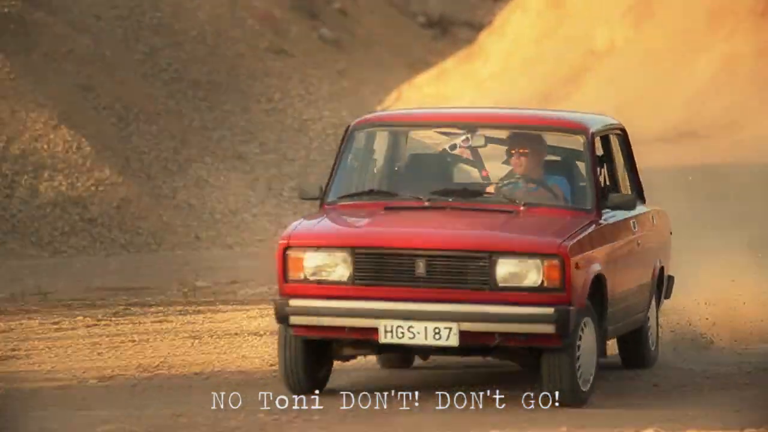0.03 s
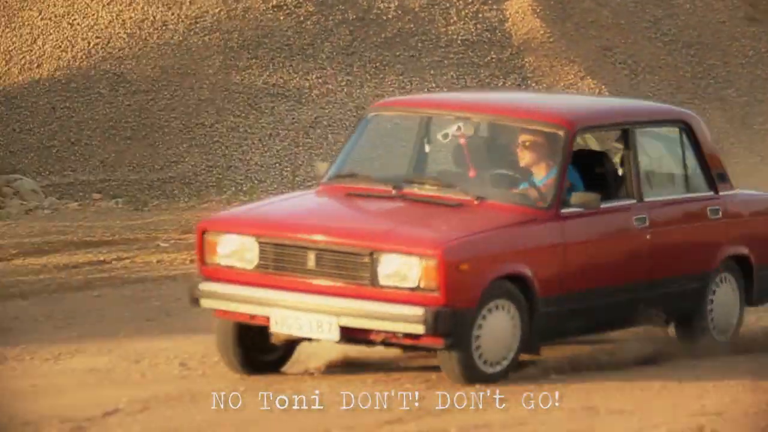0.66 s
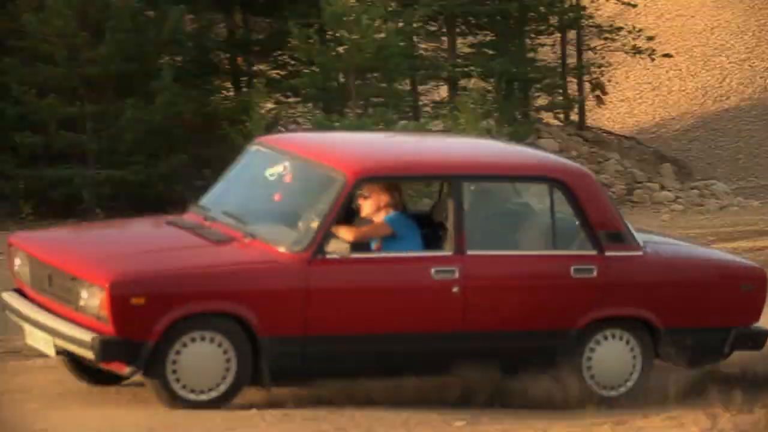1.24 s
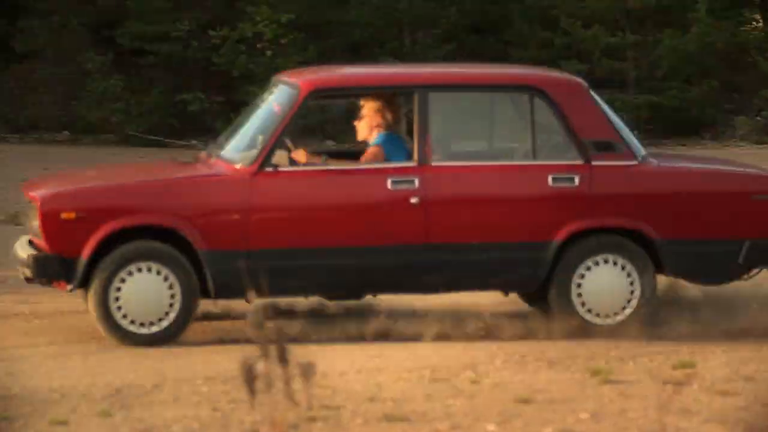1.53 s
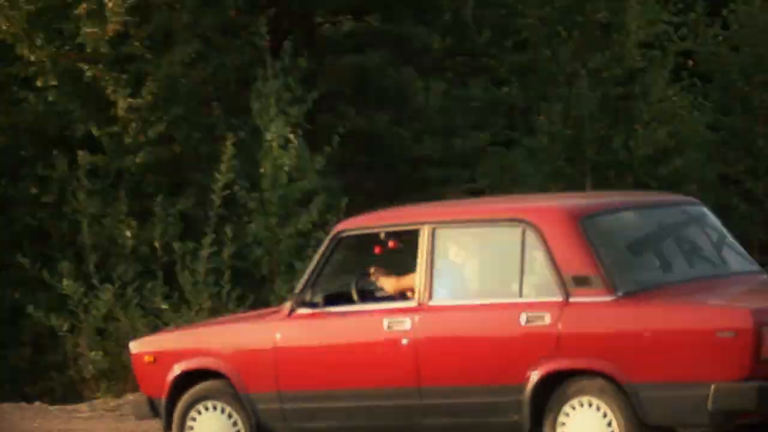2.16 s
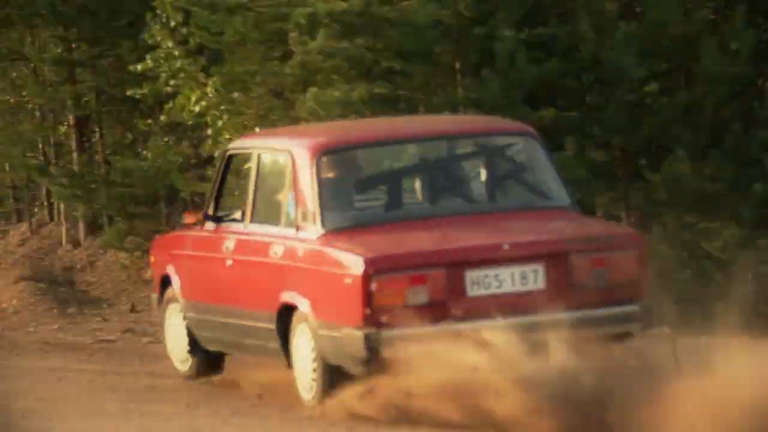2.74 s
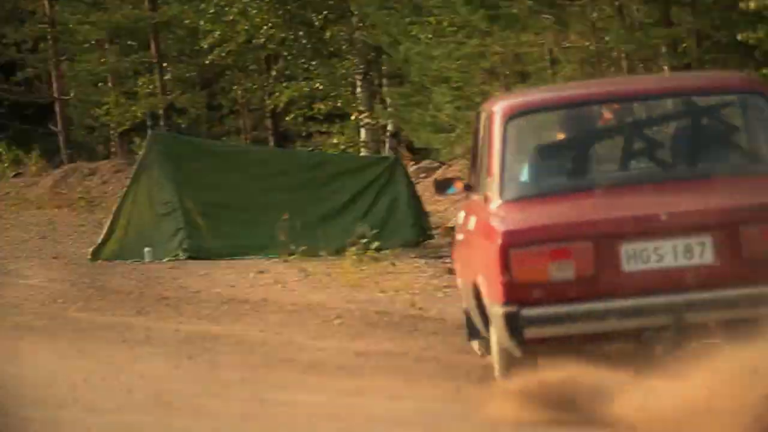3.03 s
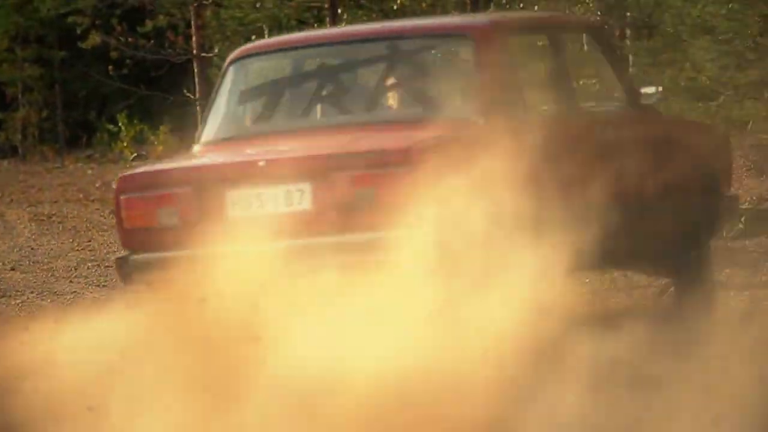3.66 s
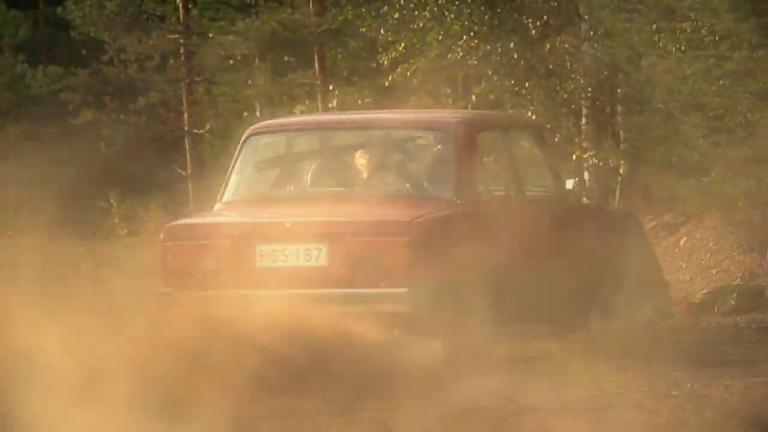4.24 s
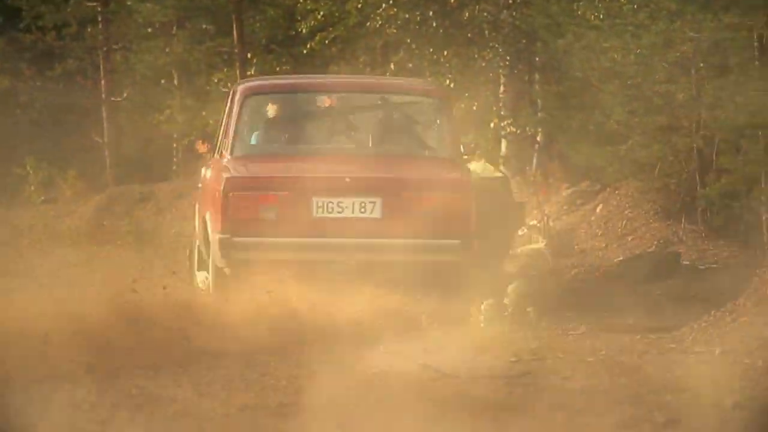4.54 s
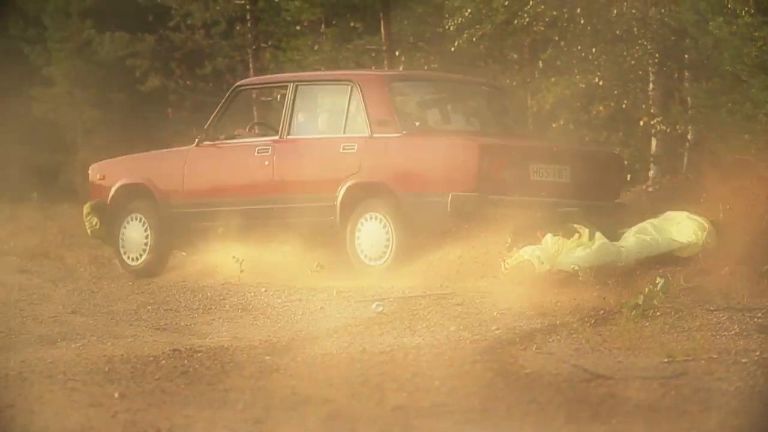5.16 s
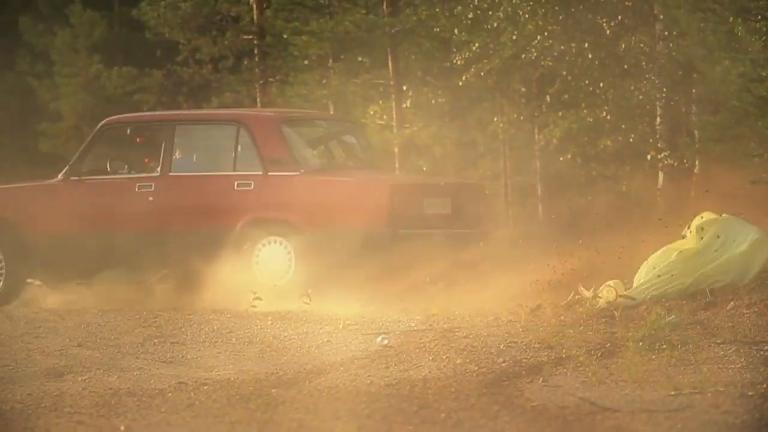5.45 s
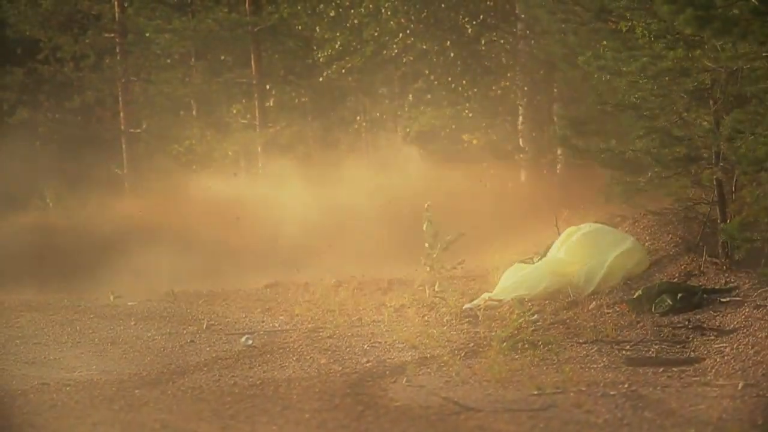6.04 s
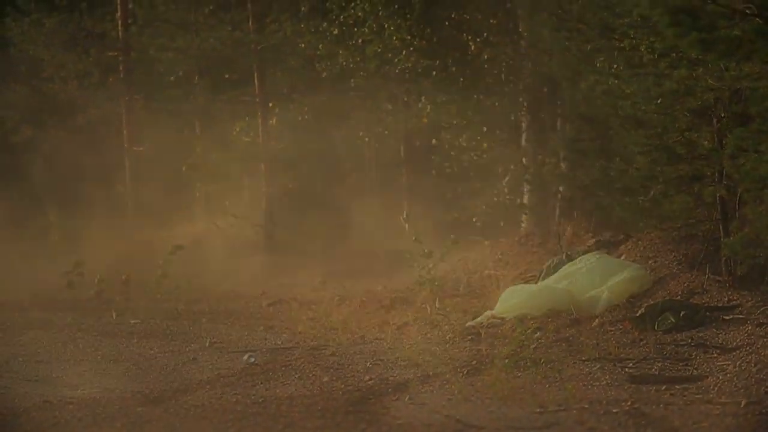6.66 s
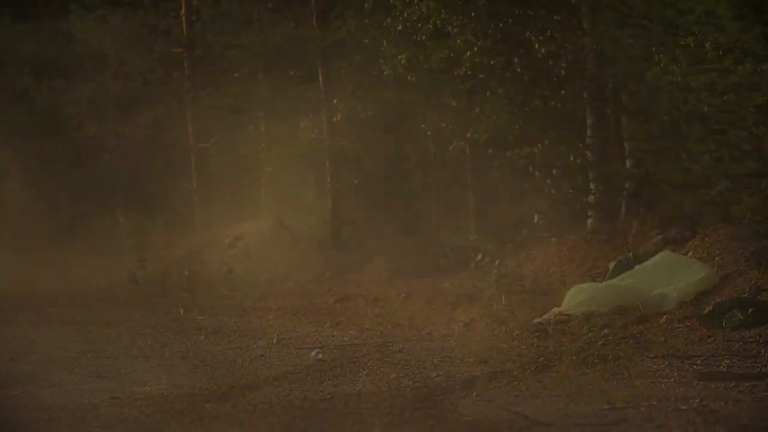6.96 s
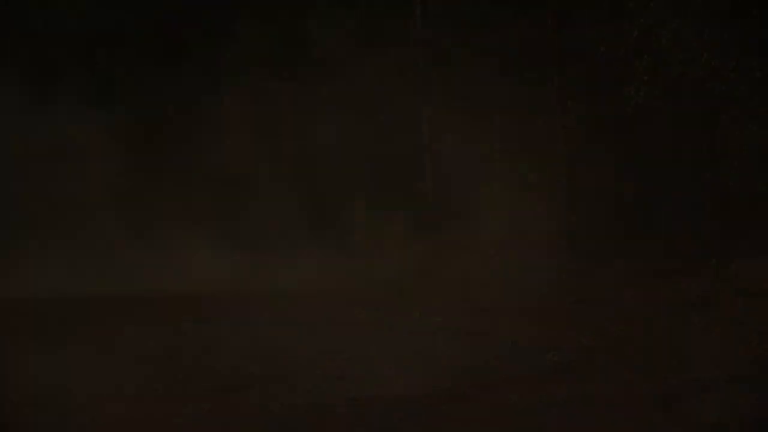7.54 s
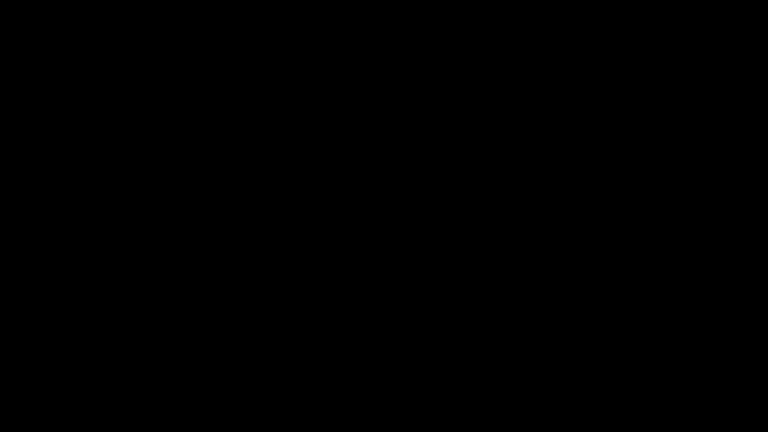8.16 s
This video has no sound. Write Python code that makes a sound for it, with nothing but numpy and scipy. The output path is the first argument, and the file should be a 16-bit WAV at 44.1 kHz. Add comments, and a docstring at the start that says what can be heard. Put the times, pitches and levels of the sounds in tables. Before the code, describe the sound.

A car comes closer over loose gravel in the open air, its engine droning at high, slightly wavering revs above crunching tyres. Grit sprays at about 1 second. The car is loudest as it slides past between 1.5 and 2.7 seconds, the exhaust booming, the revs climbing and the tyres roaring and scrubbing. At 2.8 seconds a stone hits the body with a loud, sharp crack and a thin ping. The skid continues as the car moves away. Around 4.6 seconds the wheels make a cluster of dull thumps and dry snaps. Showers of hissing grit follow until about 6.3 seconds, with stones ticking, knocking and ringing lightly on the metal. More thumps come between 6.2 and 6.5 seconds. The level then eases down, the revs drop at about 7 seconds, and the sound fades to silence just before 8 seconds.

```python
"""A high-revving four-cylinder drone and a rush of gravel close in, slide past and cross a quarry.
The exhaust booms at the firing rate; the tyres roar, scrub and crunch as they grind loose stones.
Flung grit sprays, stones knock and ping on the saloon's body, and the wheels thump over a tent
and rough ground. Near the end the throttle closes, the revs drop and the sound fades out."""
import sys
import numpy as np
from scipy import signal
from scipy.fft import rfft, irfft, next_fast_len
from scipy.io import wavfile

SR = 44100
rng = np.random.default_rng(int(sys.argv[2]) if len(sys.argv) > 2 else 0)


def inscribe(sig):
    """Save sig as 16-bit PCM at rate SR to the path in sys.argv[1].

    A 1-D sig is mono; a 2-D sig holds one channel per row.
    Samples are clipped to [-1, 1] before scaling.
    """
    pcm = np.round(np.clip(np.atleast_2d(sig).T, -1, 1) * 32767)
    wavfile.write(sys.argv[1], SR, pcm.astype(np.int16))


N = 366294
TIME = np.arange(N) / SR
EDGE_HZ = 15800  # top of the band

# tone of the tyre roar and the exhaust puffs: freq_hz, relative_db
ROAR_SPECTRUM = [(60, -34.5), (130, -6), (200, -3.5), (275, 2.5), (400, -2), (500, -5.5), (730, -3.5),
                 (1100, -12.5), (1500, -17.5), (2500, -36), (6000, -63.5)]
# share of the gravel sound heard from behind the car: time_s, share (0-1)
REAR_SHARE = [(0, 0.11), (.3, 0.4), (.6, 0.16), (1.3, 0.01), (2.1, 0), (3, 0.29), (4.1, 0.48), (4.7, 0.88),
              (7.8, 0.42)]
# engine speed: time_s, firing_hz
FIRING_RATE = [(0, 150.3), (.33, 131.4), (.75, 133), (1.36, 151), (1.62, 129.6), (1.82, 145), (2.47, 173),
               (2.85, 167.3), (4.05, 174.3), (4.45, 162), (4.85, 146.5), (5.38, 173.4), (5.75, 162.3),
               (6.97, 167.4), (7.14, 128.8), (7.28, 126.8), (7.52, 102.1), (7.85, 117.2)]


def amp(db):
    """Decibels to gain."""
    return 10 ** (np.asarray(db) / 20)


def unit(x):
    """Scales to rms 1."""
    return x / np.sqrt(np.mean(x ** 2) + 1e-20)


def curves(rows):
    """Each column after the first as a curve over time."""
    times, *columns = np.transpose(rows)
    return [np.interp(TIME, times, column) for column in columns]


def add(mix, start_s, sound):
    """Lays a sound into the mix."""
    part = mix[max(round(start_s * SR), 0):][:len(sound)]
    part += sound[:len(part)]


def blend(a, b, share):
    """Equal-power crossfade with the given share of b."""
    share = np.clip(share, 0, 1)
    return np.sqrt(1 - share) * a + np.sqrt(share) * b


def colour(x, spectrum, size=4096):
    """Minimum-phase EQ that keeps clicks sharp and falls 12 dB an octave beyond its ends; rms 1."""
    hz, db = np.transpose(spectrum)
    f = abs(np.fft.fftfreq(size, 1 / SR)) + 10
    skirts = np.minimum(f / hz[0], 1) ** 2 * np.minimum(hz[-1] / f, 1) ** 2
    log_gain = np.log(skirts * amp(np.interp(np.log(f), np.log(hz), db)))
    response = np.fft.ifft(np.exp(np.conj(signal.hilbert(log_gain)))).real
    return unit(signal.oaconvolve(x, response[:size // 2])[:N])


def resonate(x, hz, width_hz):
    """A single resonant band."""
    return signal.lfilter(*signal.iirpeak(min(hz, EDGE_HZ), hz / min(width_hz, EDGE_HZ), fs=SR), x)


def burst(t, decay_s):
    """Noise that starts at once and dies away."""
    return rng.standard_normal(len(t)) * np.exp(-t / decay_s)


def wander(rate_hz):
    """Random drift up to about the given rate; rms 1."""
    size = next_fast_len(N)
    rolloff = 1 + (np.fft.rfftfreq(size, 1 / SR) / rate_hz) ** 4
    return unit(irfft(rfft(rng.standard_normal(N), size) / rolloff)[:N])


def impacts(per_s, spread_db):
    """Random tiny collisions, most of them weak and a few strong; rms 1."""
    sizes = amp(spread_db * np.minimum(rng.exponential(1, N), 4))
    return unit(sizes * rng.choice([-1, 1], N) * (rng.random(N) < per_s / SR))


def swells(rows, attack_s, release_s, bite=0, bite_s=1):
    """Summed envelopes from rows of (start_s, end_s, heights...); bite adds an early overshoot."""
    total = 0
    for start, end, *heights in rows:
        shape = np.clip((TIME - start) / attack_s, 0, 1) * np.clip(1 - (TIME - end) / release_s, 0, 1)
        overshoot = 1 + bite * np.exp(-abs(TIME - start) / bite_s)
        total = total + np.outer(heights, shape * overshoot)
    return total


def quarry(x, t60_s=0.098, wet_db=-18):
    """Adds a faint scatter of echoes from the gravel heaps and the trees."""
    t = np.arange(SR // 2) / SR
    taps = rng.standard_normal(len(t)) * (rng.random(len(t)) < 2000 / SR) * amp(-60 * t / t60_s)
    return x + amp(wet_db) * signal.oaconvolve(x, taps / np.linalg.norm(taps))[:N]


def jingle():
    """Grit pelts a thin steel part and keeps it ringing."""
    # modes of the steel: pitch_hz, width_hz, relative_db
    steel_modes = [(6005, 230, 5), (7160, 120, 0), (11400, 210, -2)]
    # streams of grit: start_s, end_s, level_db
    streams = [(5.44, 5.73, -40), (5.87, 6.08, -55)]
    ring = sum(amp(db) * unit(resonate(impacts(271, 1.3), hz, width)) for hz, width, db in steel_modes)
    gains = [(start, end, amp(db)) for start, end, db in streams]
    return swells(gains, attack_s=.14, release_s=0.084)[0] * unit(ring)


def rings(rows, rough, rough_hz, rise_s):
    """Damped resonances roughened by rattling contact."""
    out, t = np.zeros(N), np.arange(SR // 3) / SR
    for start, db, hz, t60 in rows:
        rattle = signal.lfilter(*signal.butter(2, rough_hz, fs=SR), rng.standard_normal((2, len(t))))
        phase = 2 * np.pi * hz * t
        ring = (1 + rough * unit(rattle[0])) * np.sin(phase) + rough * unit(rattle[1]) * np.cos(phase)
        ring *= amp(-60 * t / t60) * (1 - np.exp(-t / rise_s))
        add(out, start, amp(db) * ring / abs(ring).max())
    return out


def pings():
    """Stones set steel parts ringing, high and thin."""
    # struck steel: start_s, peak_db, pitch_hz, t60_s
    strikes = [(2.776, -21, 9330, .07), (4.741, -29, 8530, 0.14), (5.203, -34, 10290, .08),
               (6.187, -31, 12000, 0.038), (6.232, -28, 7260, .14), (6.233, -33, 8000, .12),
               (6.234, -36, 14050, 0.11)]
    return rings(strikes, rough=1.0, rough_hz=171.4, rise_s=.0006)


def thumps(low_cut_hz=120):
    """Wheels and underbody hit bumps: dull knocks with no deep bass."""
    # bumps, ahead of the low cut: start_s, peak_db, pitch_hz, t60_s
    bumps = [(4.561, -11, 221, 0.054), (4.606, -5, 189.5, 0.047), (4.637, -9, 225, 0.047),
             (4.67, -7, 277, 0.087), (4.686, -3.5, 164, 0.039), (6.206, -5.5, 284.2, 0.1),
             (6.367, -16, 360, .09), (6.41, -11.5, 710, 0.035), (6.443, -3.5, 333, 0.032)]
    knocks = rings(bumps, rough=0.35, rough_hz=217.0, rise_s=0.0025)
    return signal.lfilter(*signal.butter(2, low_cut_hz, "high", fs=SR), knocks)


def cracks(breadth=0.6):
    """Stones pop or collide and tent cloth snaps: broad, dry bursts with no ring."""
    # pops and snaps: start_s, peak_db, centre_hz, decay_s
    snaps = [(0.707, -4.5, 910, 0.0063), (1.855, -29, 12090, 0.0021), (2.365, -6.5, 900, .005),
             (2.671, -6, 850, .005), (2.7762, -8, 4860, .003), (4.564, -19, 2190, 0.0058),
             (4.606, -21, 2620, .016), (4.661, -15, 2000, .004), (4.671, -6.5, 2160, 0.0028),
             (4.741, -13, 2100, 0.0016), (5.224, -13, 6800, 0.0023), (5.683, -14.5, 3380, 0.005),
             (6.357, -17.5, 3400, 0.0028), (6.46, -24.5, 4150, 0.021)]
    out, t = np.zeros(N), np.arange(SR // 12) / SR
    for start, db, hz, decay in snaps:
        snap = resonate(burst(t, decay), hz, breadth * hz)
        snap = resonate(snap, hz, 2 * breadth * hz)
        add(out, start, amp(db) * snap / abs(snap).max())
    return out


def stones(crack_gain=0.63, rebound_s=0.001904, rebound_gain=3.6):
    """Each stone cracks against the car, rings briefly and at once strikes again, louder."""
    # stones flung at the body: start_s, peak_db, pitch_hz
    strikes = [(0.962, -14, 3300), (1.9255, -13.5, 3900), (2.7739, 5.5, 3681), (3.382, -17, 3433),
               (4.7397, -13, 3280), (4.848, -13.5, 2370), (5.0222, -7, 3910), (5.1731, -20, 4200),
               (5.2145, -11.5, 3650), (5.2844, -15, 3820), (5.334, -13, 3670), (5.9686, -19, 3485),
               (6.062, -26, 5940), (6.135, -18, 3830), (6.1881, -20, 6300)]
    # modes of a struck stone: pitch_ratio, relative_db, t60_s
    modes = [(1, 7.5, 0.017), (1.13, 0, 0.018), (.86, -8, 0.0035), (1.6, -17.5, 0.013),
             (2.15, -23.5, 0.0073)]
    out, t = np.zeros(N), np.arange(SR // 12) / SR
    for start, db, hz in strikes:
        ring = sum(amp(mode_db - 60 * t / t60) * np.sin(2 * np.pi * ratio * hz * t)
                   for ratio, mode_db, t60 in modes if ratio * hz < EDGE_HZ)
        hit = np.zeros(len(t))
        for delay, gain in [(0, 1), (rebound_s, rebound_gain)]:
            crack = resonate(burst(t, decay_s=0.0036), 1.95 * hz, width_hz=4000)
            add(hit, delay * rng.uniform(.8, 1.21), gain * (ring + crack_gain * crack))
        add(out, start, amp(db) * hit / abs(hit).max())
    return out


def motion(reference_m=5, cruise_hz=165, wheel_db_per_octave=11, pass_s=2.25, swing_s=.11):
    """The drive-by: dB from nearness, dB from wheel speed, and how far the nose faces us (0-1)."""
    # the car's path from the listener: time_s, distance_m
    path = [(0, 24.3), (.25, 17.4), (.5, 9.4), (1.2, 6.54), (2.3, 4.76), (3.3, 7.6), (4.4, 13.85),
            (5.3, 17.6), (7.8, 13.9)]
    near_db = 20 * np.log10(reference_m / curves(path)[0])
    # the wheels turn with the engine
    wheel_db = wheel_db_per_octave * np.log2(curves(FIRING_RATE)[0] / cruise_hz)
    facing = .5 - .5 * np.tanh((TIME - pass_s) / (2 * swing_s))
    return near_db, wheel_db, facing


def showers(attack_s=0.082):
    """Spray and crunch boosts in dB: flung gravel starts quickly and thins as the stones come down."""
    # showers off the wheels: start_s, end_s, fall_s, spray_boost_db, crunch_boost_db
    flings = [(-.15, .03, .15, 2.5, 7.5), (.85, 1.32, 0.57, 7, 1.5), (1.15, 1.49, 0.21, 0, 3),
              (4.512, 4.67, .17, 9.5, 11), (4.855, 5.62, 0.34, 11, 5), (5.82, 6.3, 0.29, 8.5, 3),
              (6.68, 6.98, 1, -2, 5)]
    return sum(swells([(start, end, *boosts)], attack_s, fall) for start, end, fall, *boosts in flings)


def pebble_share(rolling=.24, per_db=.04):
    """The harder a shower, the more of it is pebbles and the less is sand."""
    return np.clip(rolling + per_db * showers()[0], 0, 1)


def spray(gain_db, trim_db=-42, clump_db=4.0, brightness=0.65, tick_share=0.41):
    """Sand hisses off the wheels; pebbles land in handfuls, each size with its own brief chatter."""
    # tone of flying grit: freq_hz, relative_db
    grit_spectrum = [(1500, -19), (3500, 11), (5000, -2), (7000, -0.5), (8800, -6), (12000, -9.5),
                     (15500, -17)]
    t = np.arange(SR // 50) / SR
    pebbles, ticks = np.zeros((2, N))
    for hz in np.geomspace(3200, 14000, 20):
        chatter = resonate(burst(t, decay_s=0.005), hz, width_hz=2000)
        pebbles += unit(signal.oaconvolve(impacts(26, 2.5), chatter)[:N])
    for _ in range(5):
        tick = burst(t, decay_s=0.00076)
        ticks += unit(signal.oaconvolve(impacts(12, 4), tick)[:N])
    handfuls = unit(blend(unit(pebbles), unit(ticks), tick_share) * amp(clump_db * wander(17)))
    sand = impacts(14000, 3.5)
    pebbly, rear = pebble_share(), curves(REAR_SHARE)[0]
    grit = colour(blend(sand, handfuls, pebbly), grit_spectrum)
    # pebbles that land close by keep more of their treble
    treble = unit(np.diff(grit, prepend=0))
    return amp(gain_db + trim_db) * blend(grit, treble, brightness * pebbly * (1 - rear) ** 2)


def scrub(gain_db, trim_db=-22.5, surge_db=3, surge_hz=35):
    """The tread grips and lets go in irregular surges as it is dragged sideways."""
    # tone of the dragged tread: freq_hz, relative_db
    tread_spectrum = [(200, -31.5), (370, -5.5), (460, 7.5), (540, -4.5), (700, -13), (1050, 0),
                      (1700, -39.5)]
    surges = unit(amp(surge_db * wander(surge_hz)))
    return amp(gain_db + trim_db) * surges * colour(impacts(1200, 2.3), tread_spectrum)


def tyres(pound_gain_db, roar_gain_db, crunch_gain_db):
    """Stones are rolled over and ground together; ruts make the load, and so the noise, uneven."""
    # low pounding of the ground: freq_hz, relative_db
    pound_spectrum = [(30, -23.5), (60, -4.5), (110, 2), (160, -1.5), (260, -11), (600, -53)]
    # crunch close by: freq_hz, relative_db
    near_spectrum = [(150, -17), (450, -9.5), (950, 6.5), (1400, 3), (2000, -1.5), (2900, -9.5),
                     (3600, -10.5), (4200, -19), (5000, -28), (9000, -47.5)]
    # crunch from behind the car: freq_hz, relative_db
    rear_spectrum = [(150, -21.5), (460, -6), (730, 2), (1000, -5.5), (1500, -4), (2200, -2.5), (2900, -3),
                     (3550, -1), (4200, -8.5), (5000, -19), (9000, -41)]
    load_db = wander(20)
    pound = amp(pound_gain_db - 27 + load_db) * colour(rng.standard_normal(N), pound_spectrum)
    roar = amp(roar_gain_db - 13.5 + load_db) * colour(impacts(3500, 2.55), ROAR_SPECTRUM)
    grinding = amp(blend(load_db, wander(90), 0.34))
    # behind the car the thrown stones clatter down one by one
    clatter = blend(impacts(12000, 2.8), impacts(900, 2.3), pebble_share())
    near_crunch = colour(impacts(9000, 2.36), near_spectrum)
    crunch = blend(near_crunch, colour(clatter, rear_spectrum), curves(REAR_SHARE)[0])
    return pound + roar + amp(crunch_gain_db - 25) * grinding * crunch


def gravel(near_db, wheel_db, facing):
    """All ground noise follows wheel speed and nearness, and swells in skids and showers."""
    # the tyres dig in sideways: start_s, end_s, roar_boost_db, scrub_boost_db, pound_boost_db
    skids = [(-.15, .02, 9, -1, 2.5), (1.4, 1.52, 4.5, 1, 1), (1.86, 2.02, 4, 6, -3),
             (2.33, 2.6, 4.5, 2, 7), (2.85, 4.1, 1, 3, 1), (4.52, 4.66, -0.5, -2, 11),
             (6.17, 6.47, 4.5, 5.5, -2.5), (6.76, 6.87, -0.5, 1, -10)]
    skid_roar, skid_scrub, skid_pound = swells(skids, attack_s=0.1, release_s=0.18)
    shower_spray, shower_crunch = showers()
    # front tyres crunch, rear ones scrub; pounding and spray spread wide, so fade less with distance
    rolling = tyres(pound_gain_db=0.55 * near_db + 6.5 * facing + skid_pound,
                    roar_gain_db=near_db + skid_roar,
                    crunch_gain_db=near_db + 10.5 * facing + shower_crunch)
    dragging = scrub(gain_db=near_db - 22 * facing + skid_scrub)
    grit = spray(gain_db=0.47 * near_db + 3.5 * facing + shower_spray)
    return amp(wheel_db) * (rolling + dragging + grit)


def engine(near_db, trim_db=-26, jitter=0.0038, flutter_db=0.7, rasp_db=-15):
    """The exhaust drones at the firing rate, a little unevenly; each firing lets out a puff of gas."""
    # exhaust partials, the fractions from unequal cylinders: firing_multiple, relative_db
    orders = [(.5, -16.5), (1, 2.44), (1.5, -21), (2, -10), (3, -24), (4, -21)]
    # the exhaust booms under load, hardest at first: start_s, end_s, boost_db
    booms = [(-.15, .08, 8), (.33, .55, 0), (.81, .88, 3.5), (1.15, 1.4, 3), (1.71, 2.23, 9.5),
             (2.42, 2.6, 5.5), (3.5, 4.3, 9.5), (5.04, 5.28, 10.5), (5.54, 6.05, 10), (6.27, 7.0, 9),
             (7.16, 7.29, 5.5), (7.62, 7.9, 10.5)]
    boom_db = swells(booms, attack_s=0.083, release_s=0.24, bite=.3, bite_s=.25)[0]
    firing_hz = curves(FIRING_RATE)[0] * (1 + jitter * wander(25))
    phase = 2 * np.pi * np.cumsum(firing_hz) / SR
    drone = sum(amp(db + flutter_db * wander(16)) * np.cos(order * phase + 2 * np.pi * rng.random())
                for order, db in orders)
    puffs = colour((1 + np.cos(phase)) ** 2 * rng.standard_normal(N), ROAR_SPECTRUM)
    return amp(trim_db + near_db + boom_db) * (np.sqrt(2) * drone + amp(rasp_db) * puffs)


def scene():
    """Engine, gravel and hits in the open air, in mono; only the hits get the quarry's echoes."""
    near_db, wheel_db, facing = motion()
    hits = quarry(pings() + thumps() + stones() + cracks())
    return (engine(near_db) + gravel(near_db, wheel_db, facing) + jingle() + hits)[None]


def record(dry, ease_s=6.617, ease_db_per_s=16.0, fade_s=7.62, silent_s=7.91):
    """The level eases down, then fades to silence; the loudest peaks clip and the very top is cut."""
    ease = amp(-ease_db_per_s * np.maximum(TIME - ease_s, 0))
    fade = np.interp(TIME, [fade_s, silent_s], [1, 0])
    clipped = np.clip(dry * ease * fade, -1, 1)
    high_cut = signal.firwin(511, EDGE_HZ, window=("kaiser", 9), fs=SR)
    return signal.oaconvolve(clipped, high_cut[None], "same")


dry = scene()
out = record(dry)
inscribe(out)
```